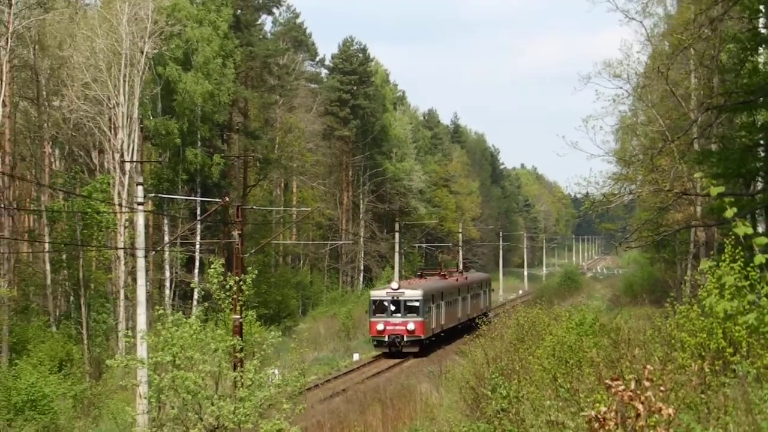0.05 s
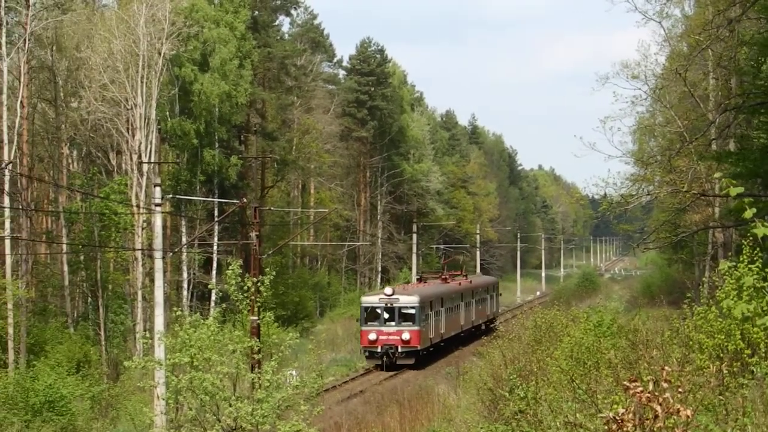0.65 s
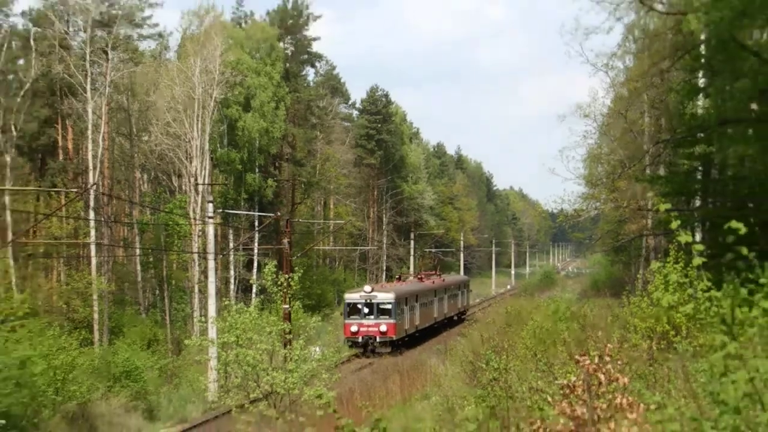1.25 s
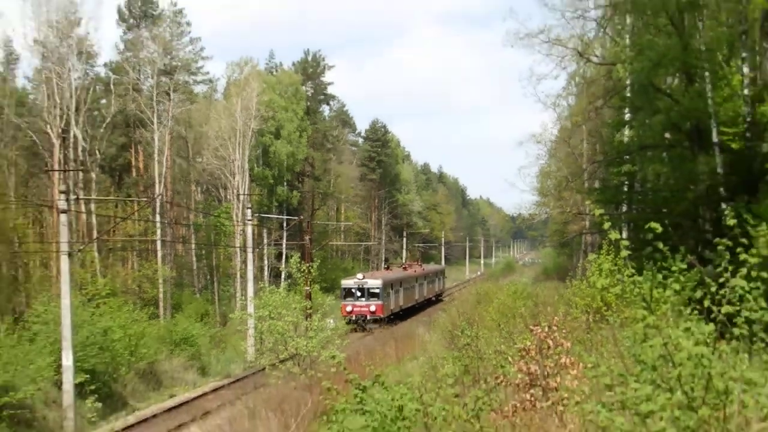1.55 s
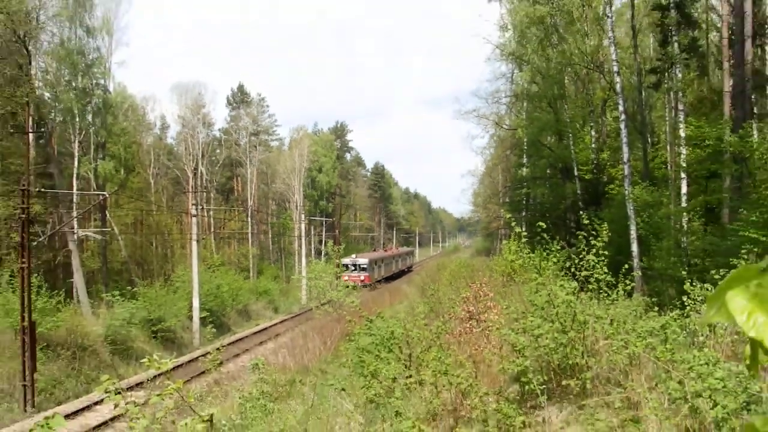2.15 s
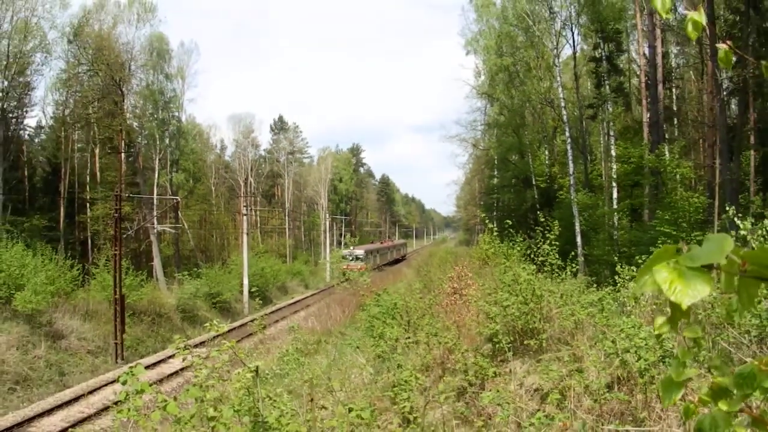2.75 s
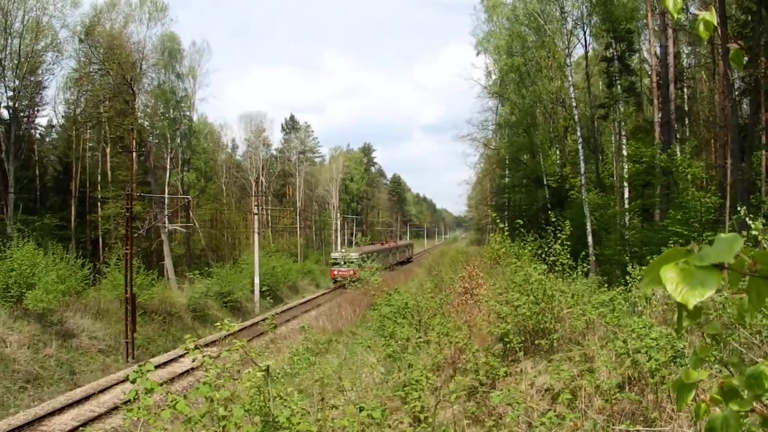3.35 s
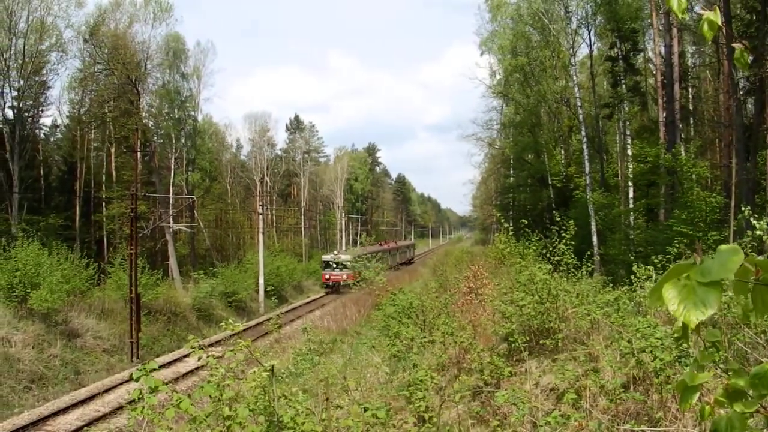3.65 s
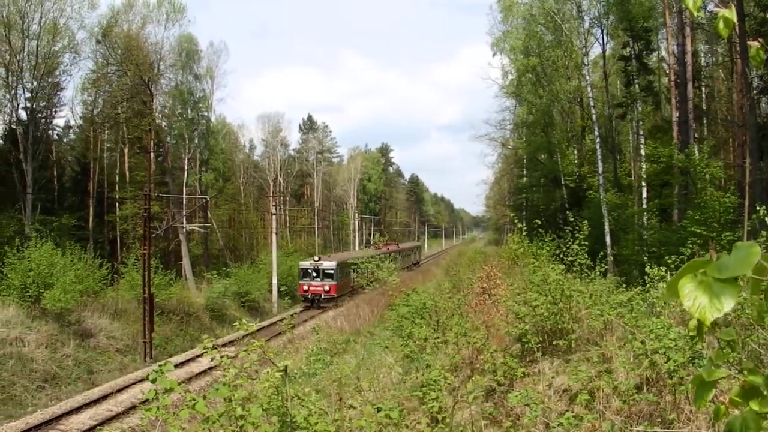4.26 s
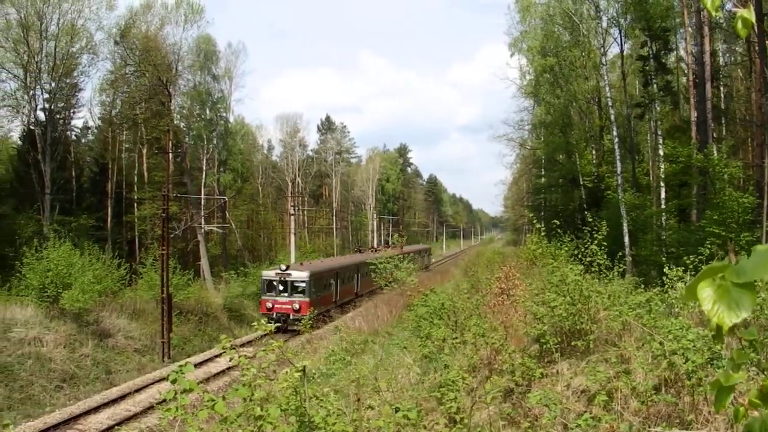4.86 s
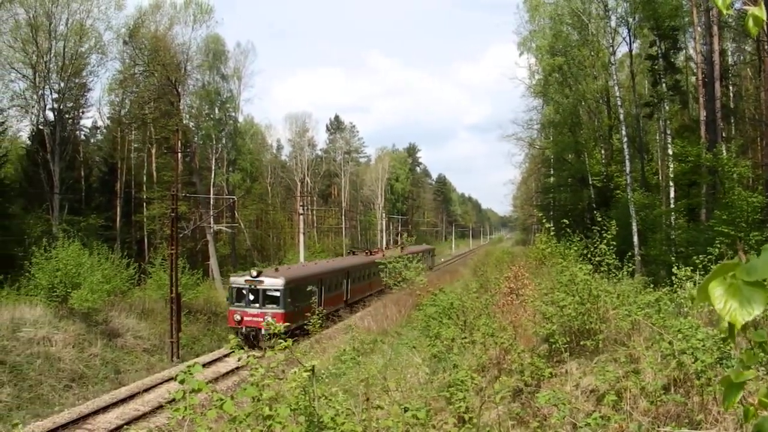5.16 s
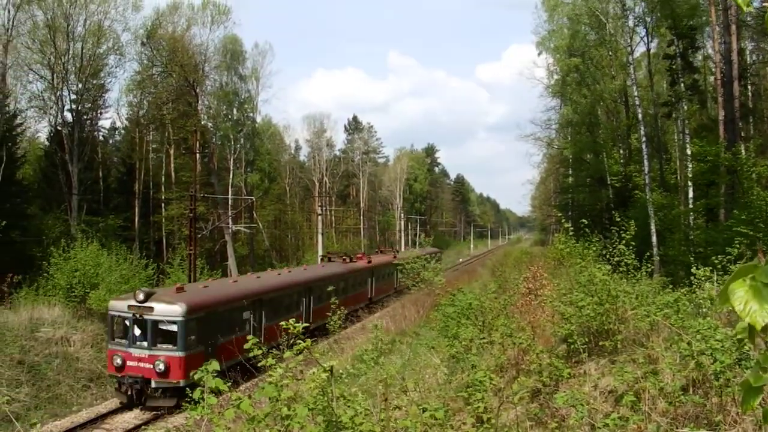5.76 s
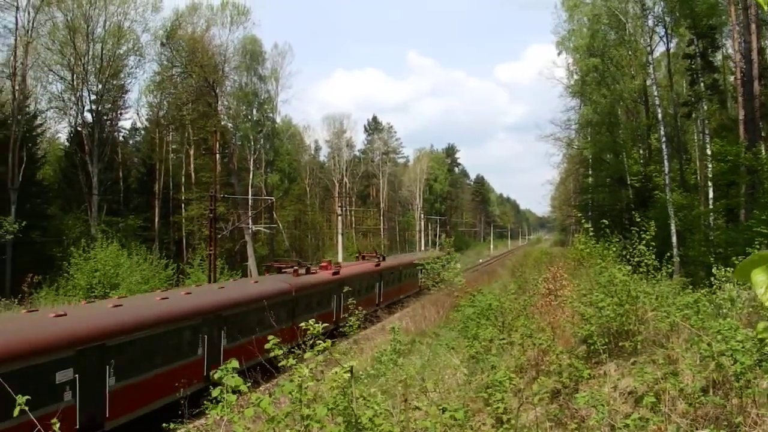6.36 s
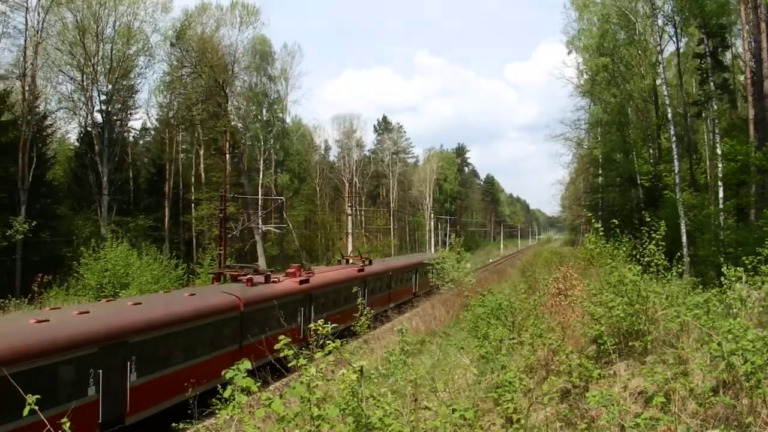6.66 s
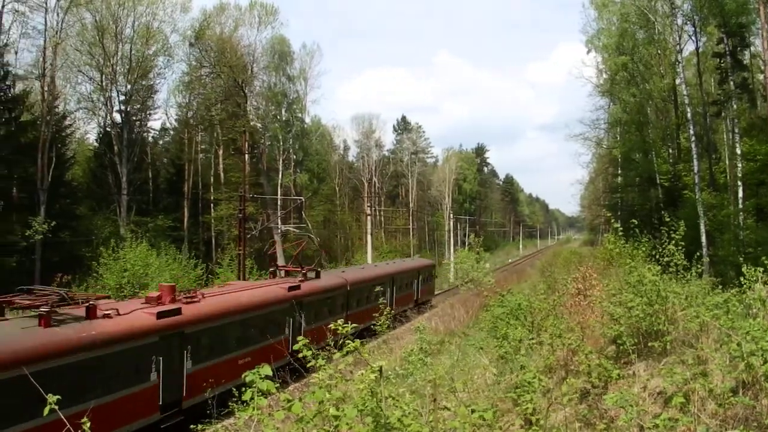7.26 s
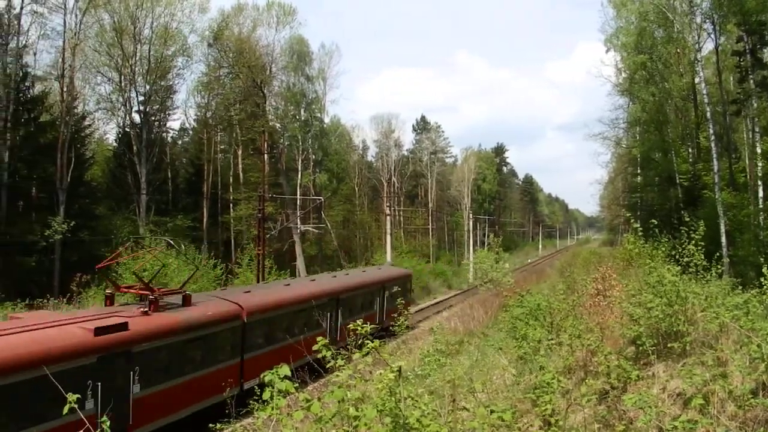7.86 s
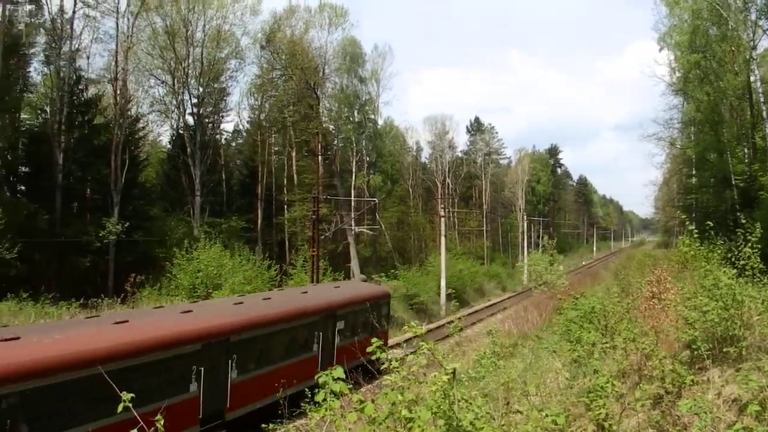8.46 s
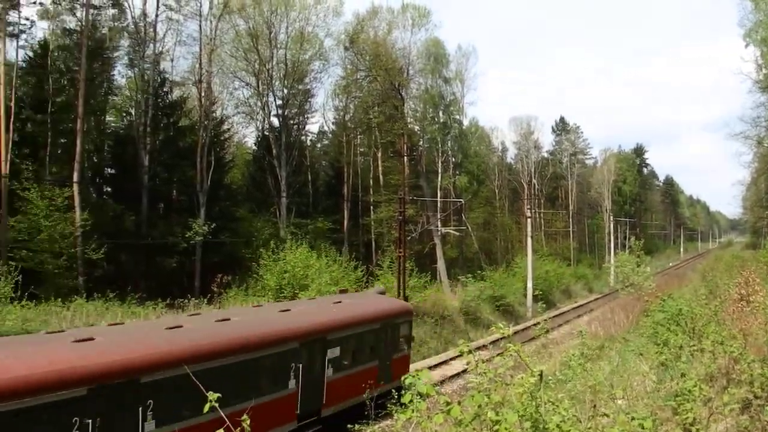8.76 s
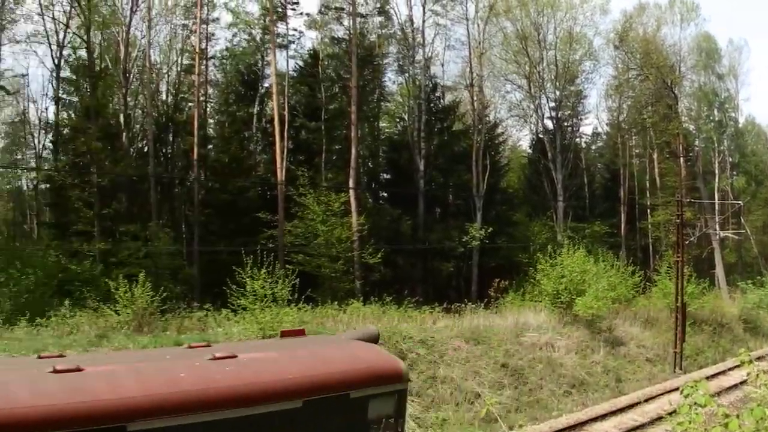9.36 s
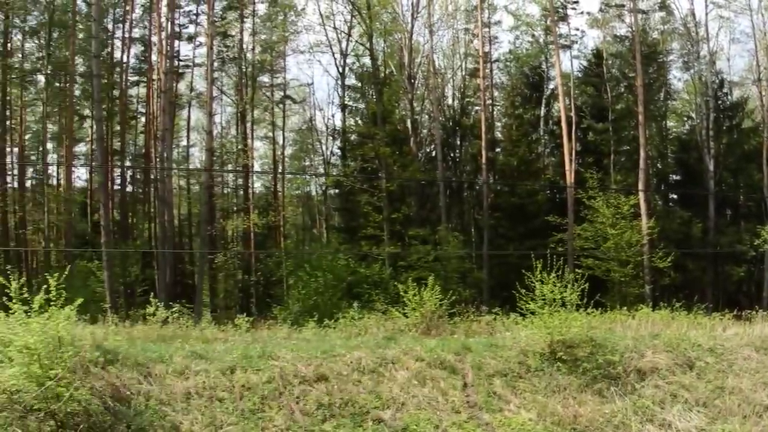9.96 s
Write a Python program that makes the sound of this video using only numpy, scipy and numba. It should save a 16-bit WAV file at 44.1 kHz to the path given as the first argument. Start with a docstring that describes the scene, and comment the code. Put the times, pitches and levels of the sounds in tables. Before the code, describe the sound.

An electric train approaches with a steady roar and passes close by, its wheels clacking in pairs over rail joints.

```python
"""A three-car electric train comes down a forest line and passes a camera on the bank.
First the rough wheels and rails roar, duller while the lens zooms; handling or wind thuds on the mic.
From about 3 s the axles clack in pairs over the rail joints, a hiss running ahead of each far clack.
The camera's gain control ducks the roar after each loud clack and lets it swell back.
From about 7 s the cars roll by a few metres away, crushing grit and making their wheels ring faintly."""
import sys
import numpy as np
from scipy import signal
from scipy.fft import rfft, irfft
from scipy.io import wavfile
from scipy.ndimage import uniform_filter1d
from numba import njit

SR = 44100
rng = np.random.default_rng(int(sys.argv[2]) if len(sys.argv) > 2 else 0)


def generate_wav(sig):
    """Save sig (samples, or channels by samples) to the path in sys.argv[1] as 16-bit PCM at SR."""
    pcm = np.round(np.clip(np.atleast_2d(sig).T, -1, 1) * 32767).astype(np.int16)
    wavfile.write(sys.argv[1], SR, pcm)


N = 441000
T = np.arange(N) / SR
SPEED_M_S, AXLE_GAP_M = 20.6, 2.7


def undb(db):
    """Turn decibels into a number to multiply a sound by."""
    return 10 ** (np.asarray(db) / 20)


def unit(x):
    """Scale a sound to an average power of 1."""
    return x / np.sqrt(np.mean(x ** 2))


def colour_db(points, hz):
    """Read the level at a frequency from a colour: a list of (Hz, dB) points."""
    freqs, db = np.transpose(points)
    return np.interp(np.log(hz + 1), np.log(freqs), db)


def tint(x, points):
    """Filter a sound to give it a colour."""
    gain = undb(colour_db(points, np.fft.rfftfreq(len(x), 1 / SR)))
    return irfft(rfft(x) * gain, len(x))


def shelf(value, corner, order):
    """Step smoothly from 0 below the corner to 1 above it."""
    return 1 - 1 / (1 + (value / corner) ** order)


def walk(t, rate):
    """A wobble: random values joined by lines, `rate` of them a second."""
    return np.interp(t * rate, np.arange(1024), rng.standard_normal(1024))


def add(out, start_s, x):
    """Mix a short sound in at the given time."""
    i = max(int(start_s * SR), 0)
    out[i:i + len(x)] += x[:max(N - i, 0)]


# A bogie is a frame with two axles under a car. Each entry: metres behind the first bogie.
BOGIE_BEHIND_M = [0, 14.87, 21.07, 36.92, 43.14, 58.01]
# The same bogies. Each row: level of its passing roar in dB, change to its clacks in dB.
BOGIE_LEVELS = [(-10.8, 0), (-12, 0), (-17.5, -4.5), (-16.2, -3), (-16.5, -6), (-19, -3)]
def bogie_passes(lag_s=.01):
    """Time and level of each bogie's loudest roar, just after it strikes the nearest joint."""
    first_s = RAIL_JOINTS[-1][0] + lag_s
    return [(first_s + behind / SPEED_M_S, db) for behind, (db, _) in zip(BOGIE_BEHIND_M, BOGIE_LEVELS)]


def swell(t, at, width_s=0.17):
    """The rise and fall in loudness as a bogie goes by."""
    return np.exp(-((t - at) / width_s) ** 2 / 2)


# The rails' steady roar. Each row: time in seconds, level in dB, wheel brightness in dB, hiss in dB.
RAIL_ROAR = [(0, -18.7, -1, -2.5), (0.949, -17, -0.5, -1.5), (1.2, -18.5, 1.5, -1.5), (2.7, -20, 1, -3),
             (2.95, -18.5, -.3, 1), (3.7, -18.5, -1.5, -4.5), (4.3, -17, .5, 1), (4.68, -19.2, -0.5, -2),
             (4.85, -16.3, 2.5, 6.5), (5.4, -18.8, 2, 1.5), (6.1, -11, 1.2, 0.5), (6.45, -13.8, 1, 3),
             (6.78, -12, -1.5, -2.5), (7.1, -15.5, -.5, -5), (7.33, -12.5, -.5, -1), (8.3, -18, -.5, -0.5),
             (9.2, -23, -.5, -1.5), (10, -20.8, -.5, -3)]
# The roar turns from far to near between these two times in seconds.
FAR_TO_NEAR_S = (2.65, 6.6)
def roar_shape(t):
    """Level, nearness (0 to 1), brightness and hiss of the roar; each bogie adds a swell of level."""
    times, *columns = np.transpose(RAIL_ROAR)
    rails_db, bright_db, hiss_db = (np.interp(t, times, column) for column in columns)
    power = undb(rails_db) ** 2 + sum((undb(db) * swell(t, at)) ** 2 for at, db in bogie_passes())
    return 10 * np.log10(power), np.interp(t, FAR_TO_NEAR_S, (0, 1)), bright_db, hiss_db


# The roar's colour from far off and from close by. Each row: frequency in Hz, level in dB.
FAR_COLOUR = [(15, -59), (25, -28), (91, -21), (215, -23.5), (421, -7), (509, 0), (614, -4), (945, 0),
              (1270, -5.5), (1490, -1), (1850, -13), (2360, -13), (4870, -25), (7700, -48), (15500, -66.5)]
NEAR_COLOUR = [(15, -63), (25, -29), (86, -24), (173, -12.5), (253, -15), (523, 0), (804, -3),
               (1300, -11.5), (1450, -10), (1900, -20), (2490, -16), (4620, -25), (7910, -42.5),
               (11500, -46), (15500, -57)]
# Where track and wheels ring or sound hollow.
# Each row: frequency in Hz, width in Hz, boost from far off in dB, boost from close by in dB.
TRACK_RESONANCES = [(141, 77, -2.5, 0), (217, 70, -1.5, -1), (369, 120, 1, 1.5), (524, 90, 1.5, -1),
                    (750, 150, 1.5, 0), (880, 100, 0.5, 2.5), (1030, 120, -1, 0), (1200, 190, 1, 2),
                    (1480, 143, 2.5, 2), (2050, 310, 2, 0.5), (2510, 190, 0, 2.5), (2950, 150, 1, 1.5),
                    (3350, 360, -1, -2.5), (4950, 500, 3.5, 1), (11750, 400, 1, 1), (14000, 900, 2, -2)]
# The sleepers (beams under the rails) boom under load. Each row: time in seconds, boost in dB.
SLEEPER_BOOMS = [(4.8, 3.5), (5.3, 3.5), (6.07, 4), (6.7, 4.5), (7.45, 2.5), (8.5, 2.5)]
def rolling(wheel_hz=1500, hiss_hz=7000, flutter_db=1.18, throb_db=0.52,
            sleeper_hz=440, sleeper_width_hz=260, rest_db=-2, boom_s=.2, size=2048):
    """Rough wheels on rough rails shake the track into a roar that changes colour as the train nears."""
    hz, t, noise = signal.stft(rng.standard_normal(N), SR, nperseg=size)
    hz = hz[:, None]
    level_db, near, bright_db, hiss_db = roar_shape(t)
    db = (1 - near) * colour_db(FAR_COLOUR, hz) + near * colour_db(NEAR_COLOUR, hz)
    for centre, width, far_db, near_db in TRACK_RESONANCES:
        db += ((1 - near) * far_db + near * near_db) * np.exp(-2 * ((hz - centre) / width) ** 2)
    db += bright_db * shelf(hz, wheel_hz, order=4) + hiss_db * shelf(hz, hiss_hz, order=8)
    db -= 10 * np.log10(np.mean(undb(db) ** 2, axis=0))  # keep the colour, even out the power
    # the sleepers boom, and rest in between
    load_db = near * rest_db + sum(lift * np.exp(-((t - at) / boom_s) ** 2) for at, lift in SLEEPER_BOOMS)
    db += load_db * np.exp(-((hz - sleeper_hz) / sleeper_width_hz) ** 2)
    # rough patches of rail make each octave flutter, and all of them throb together
    for octave in range(5, 14):
        band = np.maximum(1 - abs(np.log2(hz + 1) - octave), 0)
        db += flutter_db * walk(t, 22) * band
    db += level_db + throb_db * walk(t, 14)
    return signal.istft(noise * undb(db), SR, nperseg=size)[1][:N]


# Soft low thuds on the microphone. Each row: start in seconds, level in dB, pitch in Hz.
LOW_THUDS = [(.325, -31, 181), (.635, -40, 110), (1.548, -38.5, 130), (1.72, -38, 230), (2.447, -35, 150),
             (2.52, -39, 90), (2.648, -32, 170), (3.63, -38, 150), (3.712, -24.5, 181), (4.6, -36, 100)]
# The colour of a thud. Each row: frequency in Hz, level in dB.
THUD_COLOUR = [(25, -16), (60, -5), (110, -3), (190, -2), (240, -3.5), (400, -30), (1500, -70)]
def low_thuds(swell_s=.011):
    """Handling or puffs of wind thud on the microphone: each is low noise plus one low tone."""
    out, t = np.zeros(N), T[:SR // 4]
    envelope = t / swell_s * np.exp(1 - t / swell_s)
    for start_s, db, hz in LOW_THUDS:
        body = unit(tint(rng.standard_normal(len(t)), THUD_COLOUR))
        tone = np.sin(2 * np.pi * hz * t)
        add(out, start_s, undb(db) * envelope * (0.87 * body + 0.63 * tone))
    return out


# The lens zooms out. Each row: time in seconds, share of the duller sound from 0 to 1.
ZOOM_SHARE = [(1, 0), (1.17, 1), (2.7, 1), (2.84, 0)]
# The colour of that duller sound. Each row: frequency in Hz, change in dB.
DULL_COLOUR = [(70, -1.5), (160, -9.5), (260, -6.5), (500, -8.5), (1000, -5.5), (1500, -8.5), (1950, -14),
               (2250, -23), (2700, -12), (4800, -9.5), (8000, -18.5), (11000, -4.5), (15000, 1)]
def zoom_dulling(x):
    """The sound turns duller while the lens zooms."""
    share = np.interp(T, *np.transpose(ZOOM_SHARE))
    return (1 - share) * x + share * tint(x, DULL_COLOUR)


def grit(per_s=500, spread_db=4.5, grit_db=-24, burst_db=4.5):
    """Specks crushed between wheel and rail tick in uneven bursts, growing as the train nears."""
    level_db, near, _, hiss_db = roar_shape(T)
    specks = (rng.random(N) < per_s / SR) * undb(spread_db * np.clip(rng.standard_normal(N), -2, 2))
    colour = [(300, -30), (1500, -1), (2600, 2), (5200, 0.5), (7500, -9), (12000, -13), (15500, -23)]
    ticks = unit(tint(specks, colour))
    return ticks * near * undb(level_db + hiss_db + grit_db + burst_db * walk(T, 50))


# Gaps between rails, far to near. Each row: first strike in seconds, level in dB, distance in metres,
# change for a bogie's rear axle in dB, fade in dB per second as the cars get in the way.
RAIL_JOINTS = [(2.787, -20, 50, 1, 20), (4.137, -1, 36, -11.5, 25.5), (5.500, -1, 25, -5.5, 3.6),
               (6.888, 2.5, 3.4, -4.5, 0.19)]
def axle_blows():
    """Both axles of every bogie strike every joint: a list of (seconds, dB, metres away)."""
    blows = []
    for first_s, joint_db, metres, rear_db, fade_db_per_s in RAIL_JOINTS:
        for behind, (_, bogie_db) in zip(BOGIE_BEHIND_M, BOGIE_LEVELS):
            late_s = behind / SPEED_M_S
            db = joint_db + bogie_db - fade_db_per_s * late_s
            blows.append((first_s + late_s, db, metres))
            blows.append((first_s + late_s + AXLE_GAP_M / SPEED_M_S, db + rear_db, metres))
    return blows


def rail_hiss(lead_s_per_m=.002, hiss_db=-9, loss_db_per_m=0.86, rise_s=0.0054, fade_s=0.07,
              far_m=16, rasp_db=3):
    """A blow's treble runs faster along the rail than through air, so it sizzles before a far clack."""
    out, t = np.zeros(N), T[:SR // 4]
    colour = [(2000, -20), (5000, 0), (8000, 0), (11500, 0), (15500, -7)]
    for strike_s, db, metres in axle_blows():
        hiss = unit(tint(rng.standard_normal(len(t)), colour))
        envelope = np.exp(-t / fade_s) * (1 - np.exp(-t / rise_s)) * undb(rasp_db * walk(t, 400))
        gain = undb(db + hiss_db - loss_db_per_m * metres) * shelf(metres, far_m, order=4)
        add(out, strike_s - lead_s_per_m * metres, gain * envelope * hiss)
    return out


# The colour of struck steel. Each row: frequency in Hz, level in dB.
CLACK_COLOUR = [(30, -32), (100, -19.5), (250, -9), (600, -2.5), (1150, -1), (1800, -9), (3000, -10),
                (5400, -12.5), (7400, -27), (11000, -31.5), (14000, -37), (15500, -41)]
# A loose part knocks under the floor. Each row: start in seconds, level in dB, distance in metres.
LOOSE_KNOCKS = [(7.209, -15, 5)]
def clacks(crack_s=0.0013, ring_s=0.0099, ring_db=-3, trees_s=0.078, trees_db=-19,
           blur_s_per_m=.00028, air_db_per_m=0.18, air_hz=5000):
    """A wheel drops into a gap: a crack, a short ring of steel and a faint echo from the trees."""
    out, t = np.zeros(N), T[:SR // 4]
    tail = undb(ring_db) * np.exp(-t / ring_s) + undb(trees_db) * np.exp(-t / trees_s)
    for start_s, db, metres in axle_blows() + LOOSE_KNOCKS:
        # distance blurs the crack and dulls its colour
        blur_s = metres * blur_s_per_m
        colour = [(hz, level - air_db_per_m * metres * hz / air_hz) for hz, level in CLACK_COLOUR]
        rise = 1 - np.exp(-(t / (blur_s / 2 + 1 / SR)) ** 2)
        envelope = rise * (np.exp(-t / (crack_s + blur_s)) + tail)
        burst = envelope * rng.standard_normal(len(t))
        blow = tint(np.pad(burst, (len(t), 0)), colour)  # silence in front gives the filter room
        loudest = np.sqrt(uniform_filter1d(blow ** 2, size=176).max())  # over 4 ms
        add(out, start_s - len(t) / SR, undb(db) * blow / loudest)
    return out


@njit
def hold_and_release(over_db, hold_samples, release_db, near_db):
    """How many dB to turn down: jumps with a peak, holds while peaks come close, then eases off."""
    cut_db, cut, wait = np.empty(len(over_db)), 0., 0.
    for i in range(len(over_db)):
        cut = max(cut, over_db[i])
        wait = hold_samples if over_db[i] > cut - near_db else wait - 1
        if wait < 0:
            cut = max(cut - release_db, 0.)
        cut_db[i] = cut
    return cut_db


def gain_control(x, ceiling_db=-14, hold_s=.19, release_db_per_s=26, near_db=2.5, tick_db=-28, step=256):
    """The camera turns itself down at once on a loud peak, then creeps back up."""
    peak_db = 10 * np.log10(np.abs(uniform_filter1d(x ** 2, size=176)) + 1e-12)
    cut_db = hold_and_release(peak_db - ceiling_db, hold_s * SR, release_db_per_s / SR, near_db)
    # each sudden drop of more than 4 dB makes a thin tick
    drops = np.zeros(N)
    drops[step::step] = np.maximum(np.diff(cut_db[::step]) - 4, 0)
    ticks = tint(drops, [(3000, -30), (8000, -15), (12000, 0)])
    return x * undb(-cut_db) + undb(tick_db) * ticks


# A wheel's high ringing tones. Each row: pitch in Hz, level in dB compared with the bogie's roar.
WHEEL_TONES = [(11700, -35), (14100, -37)]
def wheel_squeals(waver_hz=300, doppler=.025, turn_s=.35, detune=.012, patchy_db=3.5, lead_s=.5):
    """Wheel rims rub the rail in patches and ring; no two match, and the pitch sags as each goes by."""
    out, t = np.zeros(N), T[:SR]
    sag = 1 - doppler * np.tanh((t - lead_s) / turn_s)
    for at, roar_db in bogie_passes():
        for hz, db in WHEEL_TONES:
            pitch = hz * (1 + detune * rng.standard_normal()) * sag + waver_hz * walk(t, 900)
            rub = undb(roar_db + db + patchy_db * walk(t, 13.8)) * swell(t, lead_s) * walk(t, 250)
            add(out, at - lead_s, rub * np.sin(2 * np.pi * np.cumsum(pitch) / SR))
    return out


def scene():
    """The train and the thuds on the microphone, mixed into one channel."""
    return (rolling() + low_thuds() + grit() + rail_hiss() + clacks() + wheel_squeals())[None]


def record(dry):
    """The camera ducks loud peaks, sounds duller while zooming, and cuts the highest treble."""
    heard = zoom_dulling(gain_control(dry[0]))
    treble_cut = signal.ellip(10, .2, 80, 15800, fs=SR, output="sos")  # above 15800 Hz
    return signal.sosfilt(treble_cut, heard)[None]


dry = scene()
out = record(dry)
generate_wav(out)
```